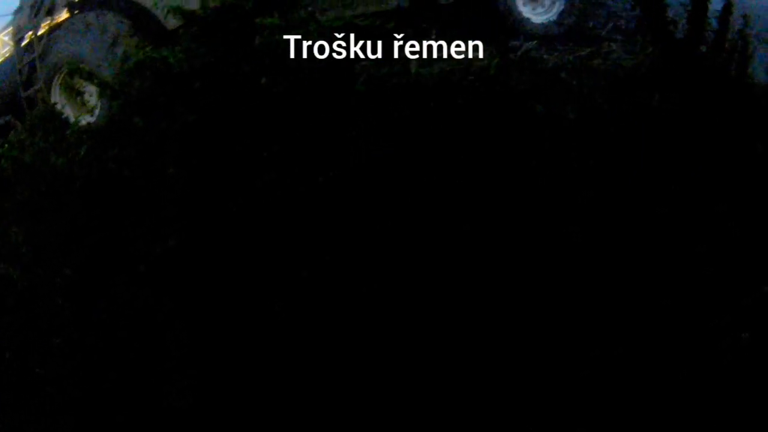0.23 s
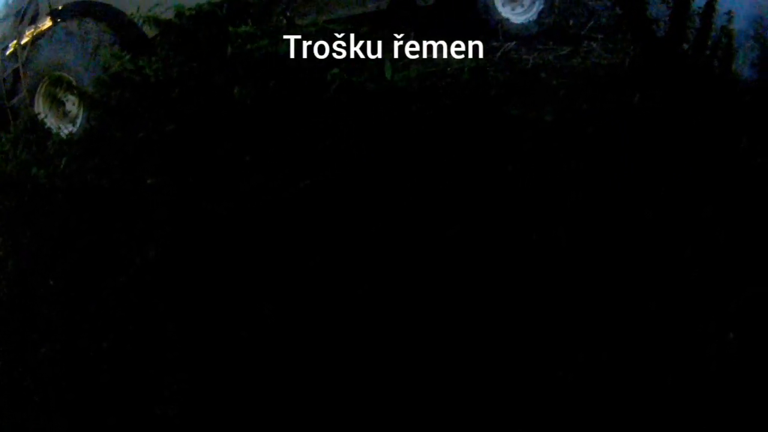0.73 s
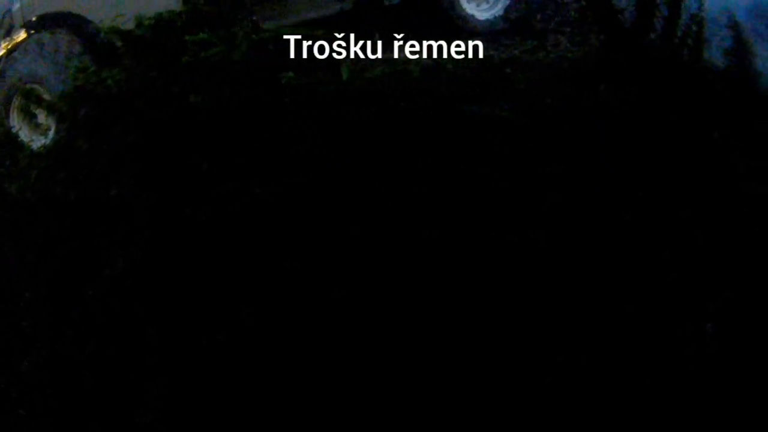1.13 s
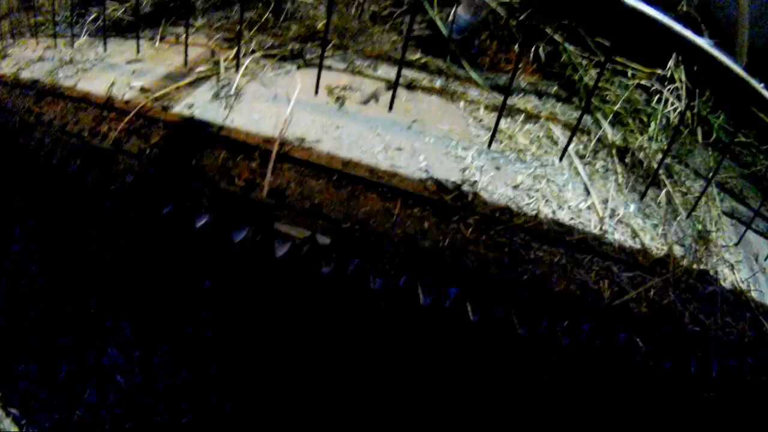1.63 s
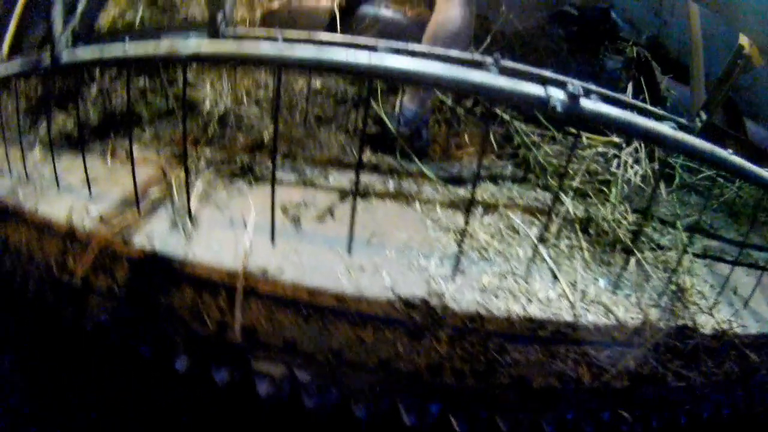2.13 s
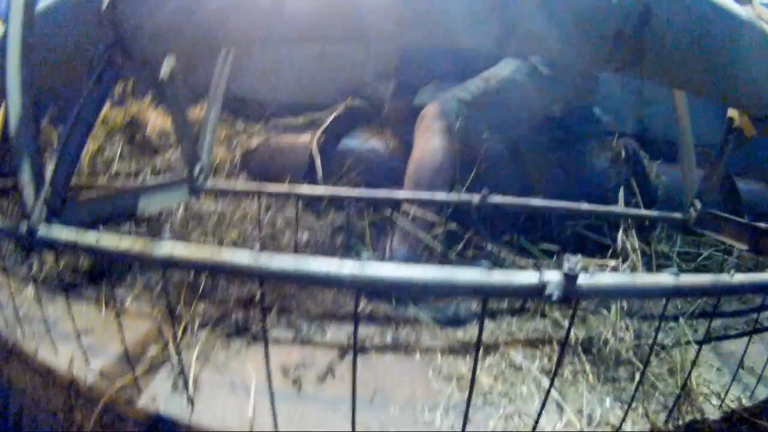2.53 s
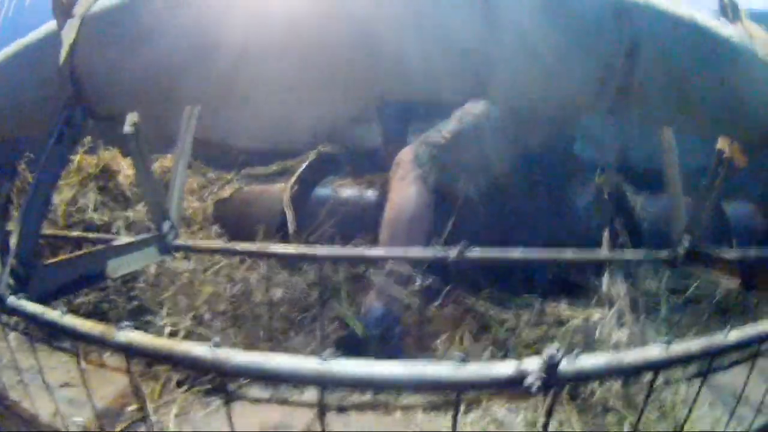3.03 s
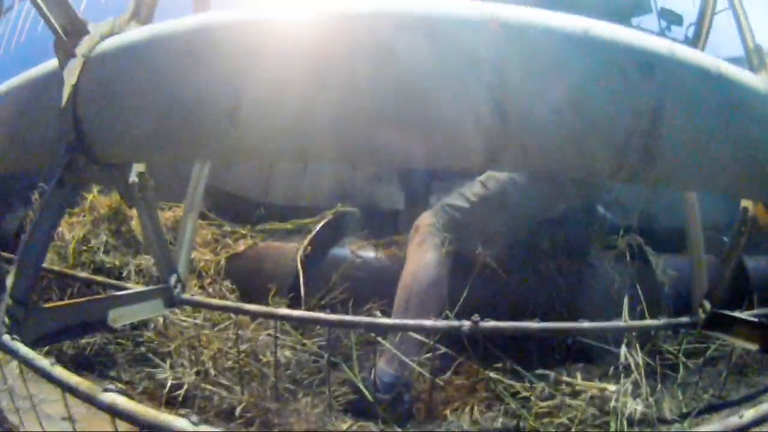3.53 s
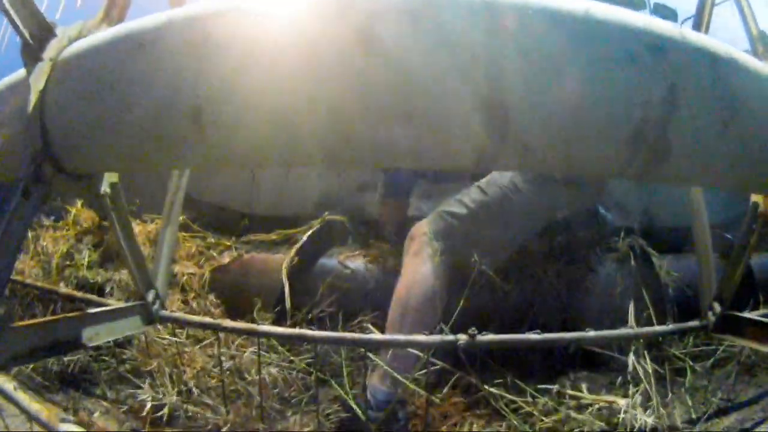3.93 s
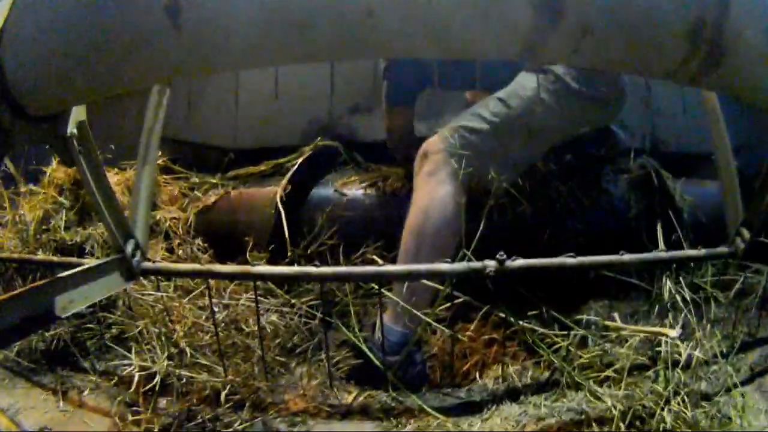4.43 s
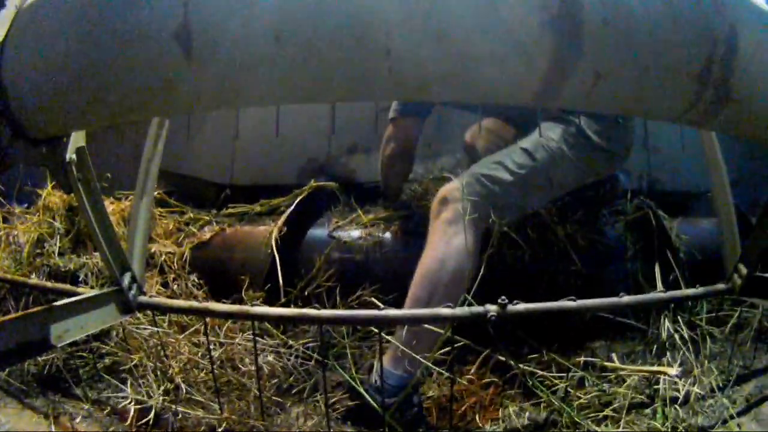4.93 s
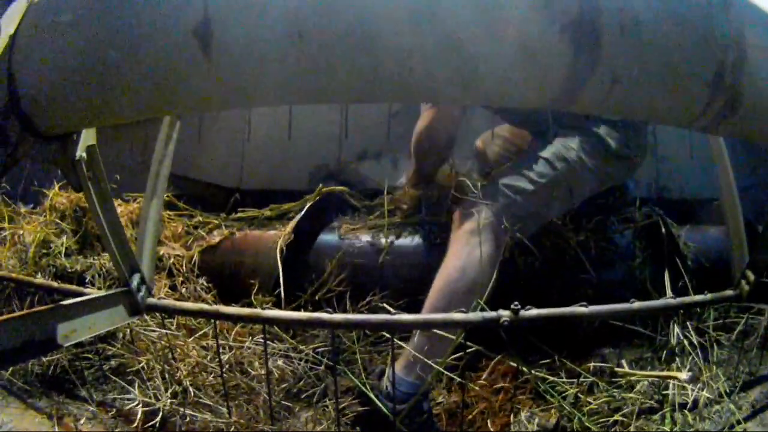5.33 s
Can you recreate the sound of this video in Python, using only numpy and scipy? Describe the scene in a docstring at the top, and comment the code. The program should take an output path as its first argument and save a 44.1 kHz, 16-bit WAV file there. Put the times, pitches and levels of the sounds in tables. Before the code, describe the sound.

Heavy diesel and threshing roar with a gear whine cuts suddenly to a softer machine hum, with straw crackles, metal taps and one short screech.

```python
"""A combine harvester stands in a field with its six-cylinder diesel, belts and threshing drum running. Sines
locked to the engine cycle give its tones, noise modulated by the firings its roar and clatter. It is heard from
the loud engine side; then the scene changes to the quieter front, above the header. There straw is pulled from
under the auger: shaped grains snap and rustle, knocks ring modes of the steel trough, a dragged stalk screeches
as resonant noise. Short gliding sines squeak faintly throughout."""
import sys
import numpy as np
from scipy import signal
from scipy.fft import rfft, irfft, next_fast_len
from scipy.io import wavfile

SR = 44100
rng = np.random.default_rng(int(sys.argv[2]) if len(sys.argv) > 2 else 0)


def put_to_file(sound):
    """Save the sound as 16-bit audio at rate SR, in the file named by the first command-line argument."""
    columns = np.atleast_2d(sound).T  # one column per channel
    safe = np.clip(columns, -1, 1)
    whole_steps = np.round(safe * 32767)
    wavfile.write(sys.argv[1], SR, whole_steps.astype(np.int16))


N = 246959
TIME = np.arange(N) / SR
CUTOFF_HZ = 15700
SWITCH_S = 1.639  # the scene changes from the engine side to the front
SIDE_CYCLES_PER_S, FRONT_CYCLES_PER_S = 13.26, 13.635  # base engine speed at each place, four-stroke cycles
GEAR_MULTIPLE = 54  # teeth meshing per engine cycle
# Knocks against the steel trough: [t/s, level/dB, tilt/(dB per octave), crackle of the fibres re level/dB]
KNOCK_EVENTS = [(2.409, -41.5, -10, -5), (3.208, -44, -2, 1), (3.4138, -37.5, 2, -7),
                (3.417, -35.5, 1, -10), (3.431, -47, -2, -9), (3.5204, -40.5, -5, -18),
                (3.523, -35.5, -8, -22), (5.4, -47, 1, -14)]


def from_db(db):
    """Logarithmic level: decibels to amplitude gain."""
    return 10 ** (np.asarray(db) / 20)


def rms_one(x):
    """Normalisation of signal power: scale to rms 1."""
    return x / np.sqrt(np.mean(x ** 2) + 1e-20)


def coloured(x, spectrum):
    """Linear filtering: shape an excitation's spectrum, falling steeply beyond both ends; rms 1."""
    hz, db = np.transpose(spectrum)
    size = next_fast_len(N)
    f = np.maximum(np.fft.rfftfreq(size, 1 / SR), 1)
    ends = np.minimum(np.minimum(f / hz[0], hz[-1] / f), 1) ** 10
    gain = from_db(np.interp(np.log(f), np.log(hz), db)) * ends
    return rms_one(irfft(rfft(x, size) * gain, size)[:N])


def drift(rate):
    """Slow random fluctuation of rms 1, with rate new values a second joined by lines."""
    knots = rng.standard_normal(N // 20)
    return rms_one(np.interp(TIME * rate, np.arange(len(knots)), knots))


def resonant_noise(hz, width_hz):
    """Resonance: noise passes twice through one damped resonator; rms 1."""
    r = np.exp(-np.pi * width_hz / SR)
    section = [1, 0, -1, 1, -2 * r * np.cos(2 * np.pi * hz / SR), r * r]
    return rms_one(signal.sosfilt([section, section], rng.standard_normal(N)))


def grains(per_s, spread_db):
    """Shot noise: random tiny clicks of very uneven size; rms 1."""
    sizes = from_db(spread_db * np.minimum(rng.exponential(1, N), 4))
    signs = rng.choice([-1, 1], N)
    clicks = rng.random(N) < per_s / SR
    return rms_one(sizes * signs * clicks)


def swell(s, spread_s):
    """Gaussian envelope: a smooth rise to 1 at s and fall again."""
    return np.exp(-.5 * ((TIME - s) / spread_s) ** 2)


def struck(s, t60):
    """Impulsive onset and exponential decay: a sudden rise about s that dies away."""
    attack_s = 0.0003  # a stalk breaks almost at once
    onset = np.clip((TIME - s) / attack_s + .5, 0, 1)
    return onset * from_db(-60 * np.clip((TIME - s) / t60, 0, 2))


def stroke(s, rise, fall):
    """Friction envelope: a rub builds up to 1 at s and lets go at its own rate."""
    return np.exp(-np.minimum(((TIME - s) / np.where(TIME < s, rise, fall)) ** 2, 20))


def tones(turns, table, slip, flutter_db):
    """Order synthesis: sines follow the engine, wavered by slip (cycles); each one's level flutters by chance."""
    out = np.zeros(N)
    angle = 2 * np.pi * (turns + slip * drift(5))
    for multiple, db in table:
        level = from_db(db + flutter_db * drift(7))
        out += level * np.sin(multiple * angle + rng.uniform(0, 2 * np.pi))
    return np.sqrt(2) * out


def firings(turns, repeat, depth, uneven_db, count=6):
    """Cyclic combustion: each cylinder fires a dying burst, part repeating every cycle, part turbulence."""
    cylinder, since = np.divmod(turns % 1 * count, 1)  # since: share of the firing interval
    strengths = from_db(uneven_db * rng.standard_normal(count))
    burst = strengths[cylinder.astype(int)] * (1 + depth * np.exp(-3 * since))
    cycle = rng.standard_normal(int(N / turns[-1]))
    knock = cycle[(turns % 1 * len(cycle)).astype(int)]
    turbulence = rng.standard_normal(N)
    return burst * (np.sqrt(repeat) * knock + np.sqrt(1 - repeat) * turbulence)


def speed_swing():
    """Speed modulation: smooth dips at set times, each followed by a smaller fixed rebound; cycles per s."""
    # Dips of engine speed: [t/s at the deepest, depth/(cycles per s)]
    sags = [(2.93, 0.089), (4.12, 0.1477), (5.4, .06)]
    spread_s = .18  # sets how long a dip takes to build and to pass
    rebound_s, rebound_share = .63, .3  # how much later, share of the depth
    swing = np.zeros(N)
    for s, sag in sags:
        swing += sag * (rebound_share * swell(s + rebound_s, spread_s) - swell(s, spread_s))
    return swing


def squeaks():
    """Stick-slip friction: belts and rubbed metal sing on one unsteady, gliding pitch as the grip varies."""
    # Squeaks: [t/s, length/s, f/Hz, level/dB rms before flutter, waver/Hz rms, glide/(Hz per s)]
    squeak_events = [(0.041, 0.026, 4300, -44.5, 170, 9000), (0.268, .025, 4400, -50, 120, 0),
                     (1.07, .012, 4150, -48, 300, 0), (1.25, 0.044, 3950, -47.5, 240, 0),
                     (1.797, 0.032, 2200, -44.5, 14, -1), (1.811, .014, 4200, -55, 98, 0),
                     (1.853, 0.037, 2230, -48, 16, 0), (2.409, 0.012, 1220, -29, 65, 0),
                     (4.35, .08, 2320, -54, 70, 0), (4.78, .08, 2315, -50.5, 70, -0.5),
                     (4.87, .06, 2336, -53, 45, 500), (4.881, .16, 2180, -55, 50, -550),
                     (5.01, .13, 2170, -51, 45, 650), (5.16, .15, 2265, -53.5, 50, 300),
                     (5.28, .08, 2140, -51, 110, 0), (5.3, .1, 2280, -56, 55, -800),
                     (5.52, .12, 2200, -56, 55, 0)]
    flutter, flutters_per_s = 0.33, 70  # the grip comes and goes: depth, rate
    out, waver = np.zeros(N), drift(700)
    for s, length, hz, db, waver_hz, glide in squeak_events:
        rub = stroke(s, length / 2, length / 2)
        pitch = hz + waver_hz * waver + glide * np.clip(TIME - s, -length, length)
        out += from_db(db) * rub * np.sin(2 * np.pi * np.cumsum(pitch) / SR)
    return np.sqrt(2) * out * (1 + flutter * drift(flutters_per_s))


def scrape():
    """Friction-excited resonance: a stalk drags ever harder over steel, screeches and slips free."""
    # Screech resonances: [f/Hz, width of each pass/Hz, level/dB rms at the peak]
    screech_bands = [(2240, 390, -38), (4850, 560, -40.5), (10900, 1300, -62)]
    screech = sum(from_db(db) * resonant_noise(hz, width) for hz, width, db in screech_bands)
    return stroke(2.456, rise=0.0063, fall=0.0014) * screech  # seconds


def trough():
    """Modal excitation: each knock rings all modes of the trough; its tilt favours low or high modes."""
    # Modes of the steel trough: [f/Hz, t60/s, relative level/dB]
    modes = [(1230, .025, -3), (1700, 0.036, -1), (2220, 0.024, -7), (2500, .02, -9), (2780, .035, -7),
             (2970, 0.038, -1.5), (3180, .035, -5.5), (3560, 0.017, -9), (3950, .02, -9),
             (4190, 0.034, -2.5), (5350, .025, -17), (5700, .025, -15), (7400, .06, -23), (8450, .04, -22),
             (12500, .03, -32)]
    pivot_hz, spread_db = 3000, 1.2  # centre of the tilt; chance per mode and knock
    contact_s = .0004  # a blunt knock takes this long to press home
    out = np.zeros(N)
    hz, t60, mode_db = np.transpose(modes)
    since = TIME[:SR // 10, None]
    press = np.minimum(since / contact_s, 1)
    rings = press * from_db(-60 * since / t60) * np.sin(2 * np.pi * hz * since)
    for s, db, tilt_db, _ in KNOCK_EVENTS:
        chance_db = spread_db * rng.standard_normal(len(hz))
        strengths = from_db(db + mode_db + tilt_db * np.log2(hz / pivot_hz) + chance_db)
        signs = rng.choice([-1, 1], len(hz))
        start = int(s * SR)
        out[start:start + len(since)] += rings @ (strengths * signs)
    return out


def straw():
    """Fracture and friction noise: fibres crackle at once in a snap or knock, in a swell in a slide."""
    # Dry stalks that snap: [t/s, level/dB before the low-pass, t60/s, upper edge f/Hz]
    snaps = [(1.8695, -21.5, .006, 7000), (1.8740, -26, .008, 4000), (1.889, -39.5, .008, 13000),
             (2.3965, -47, .01, 9000), (2.580, -48, .008, 9000), (2.9335, -48, .008, 13000),
             (3.265, -43, .012, 13000), (3.318, -45, .01, 10000), (3.414, -33, .008, 15000),
             (3.519, -43, .006, 15000), (3.5645, -40, .01, 12000), (3.569, -43, .012, 7000),
             (3.7065, -46, .008, 7000), (3.909, -44, .012, 14000), (3.9715, -44, .008, 14000),
             (3.981, -43.5, .009, 14000), (4.028, -40, .012, 3500), (4.069, -45, .008, 9000),
             (4.127, -46, .008, 8000), (5.349, -50, .008, 15000)]
    # Sliding handfuls: [t/s at the loudest, rise/s, fall/s, coarse stalks level/dB, fine husks level/dB]
    pulls = [(1.916, 0.023, 0.028, -43, -60), (2.453, 0.034, 0.004, -47.5, -59),
             (3.525, 0.057, 0.039, -52, -69), (3.925, .02, .03, -61, -66), (3.977, .018, .01, -57, -59),
             (4.069, .012, .01, -54, -65), (4.145, .022, 0.022, -55, -63), (4.9, .02, .04, -61, -70)]
    # Spectrum of fine husks: [f/Hz, relative level/dB per Hz]
    husk_spectrum = [(3900, 5), (5500, 2.5), (7000, -3.5), (9000, -13.5), (11300, -15), (12400, -27)]
    # Spectrum of coarse stalks: [f/Hz, relative level/dB per Hz]
    stalk_spectrum = [(1000, 3), (2300, 4), (3300, -1.5), (4500, -4), (6000, -13.5), (7800, -16),
                      (11000, -30), (15500, -45)]
    crackle_t60_s = 0.11  # the fibres settle after a knock
    stalks = coloured(grains(per_s=4500, spread_db=3.0), stalk_spectrum)
    husks = coloured(grains(per_s=3500, spread_db=3.2), husk_spectrum)
    crack = coloured(rng.standard_normal(N), stalk_spectrum)
    out = np.zeros(N)
    for s, db, _, crackle_db in KNOCK_EVENTS:
        out += from_db(db + crackle_db) * struck(s, crackle_t60_s) * stalks
    for s, db, t60, edge_hz in snaps:
        dull = signal.butter(2, min(edge_hz, CUTOFF_HZ), fs=SR, output="sos")
        out += signal.sosfilt(dull, from_db(db) * struck(s, t60) * crack)
    for s, rise, fall, stalks_db, husks_db in pulls:
        out += stroke(s, rise, fall) * (from_db(stalks_db) * stalks + from_db(husks_db) * husks)
    return out


def ringing_panels(panels):
    """Forced vibration of plates: shaken sheet-metal resonances ring unevenly and swell in turn."""
    sway_db, sways_per_s = 2, 6
    out = np.zeros(N)
    for hz, width, db, s, spread in panels:
        level = from_db(db + sway_db * drift(sways_per_s)) * swell(s, spread)
        out += level * resonant_noise(hz, width)
    return out


def machine_front(turns, swing):
    """Screening: the engine is shadowed, leaving a duller drone of drum and shafts and a hiss of chaff."""
    # Engine tones: [multiple of the cycle rate, level/dB rms before trim and flutter]
    engine_orders = [(2, -47.4), (3, -39.6), (4, -44.4), (5, -44.8), (6, -45.1), (8, -45.5), (11, -44.4),
                     (12, -44.2), (14, -46.6), (15, -44.9), (16, -49.2), (17, -44.7), (18, -46.4),
                     (20, -42.2), (21, -50.5)]
    # Belt-driven shafts, fan and drum: [multiple of the cycle rate, level/dB rms before trim and flutter]
    shaft_orders = [(4.47, -39.3), (8.55, -43.0), (12.78, -44.7), (15.59, -40.8), (17.84, -44.4),
                    (19.41, -43.4), (35.66, -46.5), (46.8, -53.0), (68.6, -53.0)]
    # Spectra of rumble, threshing roar and chaff hiss: [f/Hz, relative level/dB per Hz]
    rumble_spectrum = [(25, -19), (60, -3.5), (95, -2), (130, -1), (175, 1), (260, -6), (310, -8.5)]
    roar_spectrum = [(310, -7.5), (370, 0.5), (440, -2), (500, -3.5), (570, 0), (660, -4), (950, -6.5),
                     (1080, -9.5), (1250, -10.5), (1500, -13.5), (1900, -21), (2250, -22.5), (2700, -35.5)]
    hiss_spectrum = [(2700, 2), (3400, -3.5), (4200, -2.5), (4800, -11), (5800, -10.5), (6800, -18.5),
                     (9000, -27), (15500, -38)]
    drum_multiple = 31.19  # bars passing per engine cycle
    since = np.maximum(TIME - SWITCH_S, 0)
    # levels in dB; swing in cycles per s, since in s
    rumble_db = -29 + 21.5 * swing + 1.0 * drift(4)
    roar_db = -31.5 + 0.25 * drift(2.92)
    hiss_db = -60 + 1 * swell(3.55, 0.36)  # swells while the straw is worked loose
    drum_db = -44.5 + 2 * since + 38.5 * swing  # rises as the listener nears
    gear_db = -41.5 - 2 * since  # fades as the listener leaves the engine behind
    fired = firings(turns, repeat=0.093, depth=0.27, uneven_db=0.66)
    rumble = from_db(rumble_db) * coloured(rng.standard_normal(N), rumble_spectrum)
    roar = from_db(roar_db) * coloured(fired, roar_spectrum)
    hiss = from_db(hiss_db) * coloured(grains(per_s=15000, spread_db=3.0), hiss_spectrum)
    engine = from_db(0.5) * tones(turns, engine_orders, slip=0.0018, flutter_db=1.3)
    shafts = from_db(0.5) * tones(turns, shaft_orders, slip=0.0028, flutter_db=0.6)
    drum = from_db(drum_db) * tones(turns, [(drum_multiple, 0)], slip=0.00096, flutter_db=3.5)
    gears = from_db(gear_db) * tones(turns, [(GEAR_MULTIPLE, 0)], slip=.001, flutter_db=2.0)
    return rumble + roar + hiss + engine + shafts + drum + gears


def engine_side(turns):
    """Periodic combustion and gear mesh: firing tones, whine and diesel clatter over the body's roar."""
    # Engine tones: [multiple of the cycle rate, level/dB rms before trim and flutter]
    engine_orders = [(2, -48.7), (3, -38.2), (5, -37.6), (6, -43.2), (8, -33.3), (10, -43.0), (11, -39.5),
                     (13, -42.7), (14, -33.8), (17, -34.5), (18, -38.1), (21, -39.1), (28, -44.7),
                     (37, -43.2), (44, -46.0), (45, -41.0), (46, -43.7), (47, -40.9), (51, -45.1),
                     (56, -43.7), (58, -45.5), (62, -46.2), (63, -42.6), (65, -42.4), (66, -45.5),
                     (80, -49.4), (108, -49.0)]
    # Belt-driven shafts, fan and drum: [multiple of the cycle rate, level/dB rms before trim and flutter]
    shaft_orders = [(2.6, -42.0), (3.95, -43.7), (4.6, -38.0), (7.8, -45.8), (8.48, -44.2), (10.23, -42.0),
                    (12.05, -40.2), (15.35, -41.0), (15.59, -33.0), (17.57, -38.4), (19.4, -35.0),
                    (21.95, -35.6), (22.33, -36.3), (23.12, -40.0), (30.85, -41.0), (31.2, -39.5)]
    # Spectra of threshing roar and engine clatter: [f/Hz, relative level/dB per Hz]
    roar_spectrum = [(25, -12.5), (60, -9.5), (90, -9.5), (130, -5), (200, -3), (290, -1), (350, -2.5),
                     (460, -11.5), (600, -7), (660, -8.5), (760, -8.5), (880, -8), (1000, -13.5)]
    clatter_spectrum = [(1000, -2), (1180, -1), (1450, 0.5), (1630, -3), (1920, -12.5), (2200, -11),
                        (2600, -18), (3300, -25), (3850, -20), (4400, -25.0), (5100, -35.5), (6000, -36),
                        (7200, -44.5), (15500, -72)]
    # Fluttering sheet-metal guards:
    # [f/Hz, width of each pass/Hz, level/dB rms at the peak before sway, t/s at the loudest, spread/s]
    guards = [(280, 31, -24, .58, .05), (284, 42, -26.5, 0.996, 0.058), (970, 250, -31.5, 1.58, .1)]
    body_fired = firings(turns, repeat=0.12, depth=0.34, uneven_db=0.12)
    engine_fired = firings(turns, repeat=.2, depth=0.36, uneven_db=0.0)
    roar = from_db(-20.5) * coloured(body_fired, roar_spectrum)
    clatter = from_db(-30) * coloured(engine_fired, clatter_spectrum)
    engine = from_db(-0.5) * tones(turns, engine_orders, slip=0.00084, flutter_db=2.5)
    shafts = from_db(-0.2) * tones(turns, shaft_orders, slip=0.0031, flutter_db=2.5)
    whine = from_db(-32) * tones(turns, [(GEAR_MULTIPLE, 0)], slip=0.002, flutter_db=2.5)
    gears = whine * (1 + 0.39 * drift(45))
    # backlash of the timing gears smears the whine
    rattle = from_db(-37) * resonant_noise(GEAR_MULTIPLE * SIDE_CYCLES_PER_S, width_hz=70)
    return roar + clatter + engine + shafts + gears + rattle + ringing_panels(guards)


def scene():
    """Superposition with a common drive: one engine turns the machine; the side gives way to the front."""
    # Header resonances, heard in turn as the listener moves in:
    # [f/Hz, width of each pass/Hz, level/dB rms at the peak before sway, t/s at the loudest, spread/s]
    header_panels = [(345, 33, -34.5, 1.86, 0.23), (865, 430, -38.5, 1.63, 1), (490, 140, -39, 4.44, 1.2),
                     (213, 70, -31, 2.39, 0.28), (160, 40, -34.5, 4.36, 0.5), (375, 70, -45.5, 3.2, .5),
                     (955, 58, -45.5, 4.74, 1), (1430, 400, -48.5, 3.5, 0.44),
                     (2226, 280, -53.5, 4.95, .85), (4040, 570, -62.5, 2.6, 0.72),
                     (4000, 450, -64, 3.92, 0.14), (5400, 980, -68, 3.3, 0.43)]
    fade_s = .002  # how long the jump takes
    swing = speed_swing()
    base_speed = np.where(TIME < SWITCH_S, SIDE_CYCLES_PER_S, FRONT_CYCLES_PER_S)
    turns = np.cumsum(base_speed + swing) / SR  # engine cycles so far
    side = engine_side(turns)
    front = machine_front(turns, swing) + ringing_panels(header_panels) + straw() + trough() + scrape()
    moved = np.clip((TIME - SWITCH_S) / fade_s + .5, 0, 1)
    tick = from_db(-38.5) * struck(SWITCH_S, t60=.004) * rng.standard_normal(N)  # faint, at the jump
    return ((1 - moved) * side + moved * front + tick + squeaks())[None]


def record(dry):
    """Band limiting: deep bass is lost, a narrow band near 8 kHz weakened, faint hiss added, the top cut."""
    bass_cut = signal.butter(4, 22, "high", fs=SR, output="sos")
    notch = signal.iirnotch(7950, 5, fs=SR)
    top_cut = signal.ellip(10, .1, 80, CUTOFF_HZ, fs=SR, output="sos")
    hiss = from_db(-78.5) * rng.standard_normal(N)
    heard = signal.lfilter(*notch, signal.sosfilt(bass_cut, dry)) + hiss
    return signal.sosfilt(top_cut, heard)


dry = scene()
out = record(dry)
put_to_file(out)
```